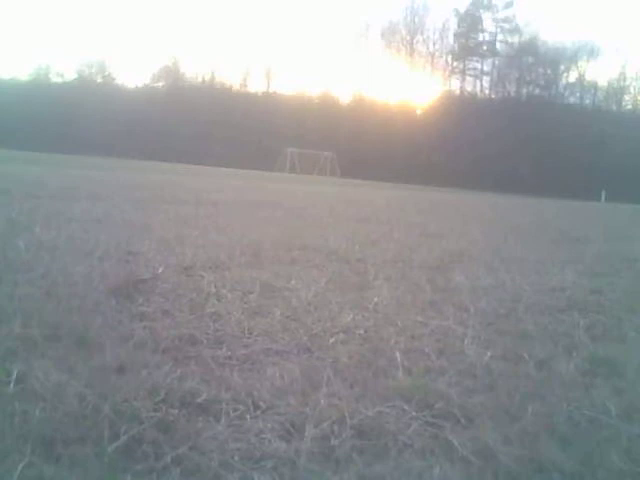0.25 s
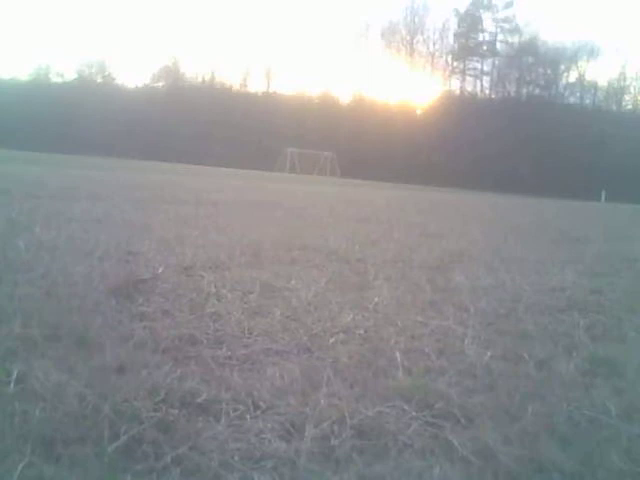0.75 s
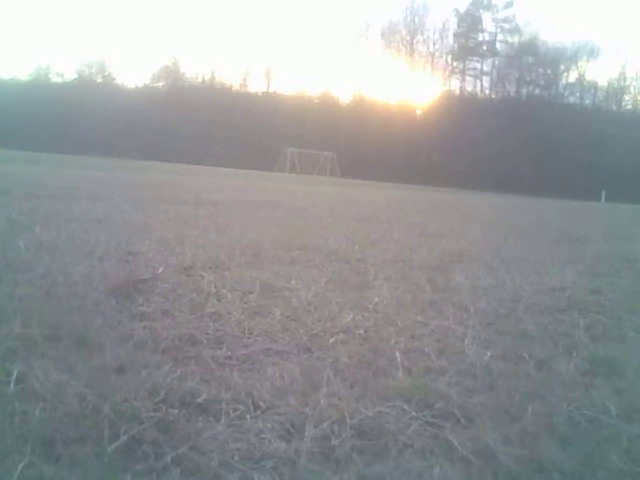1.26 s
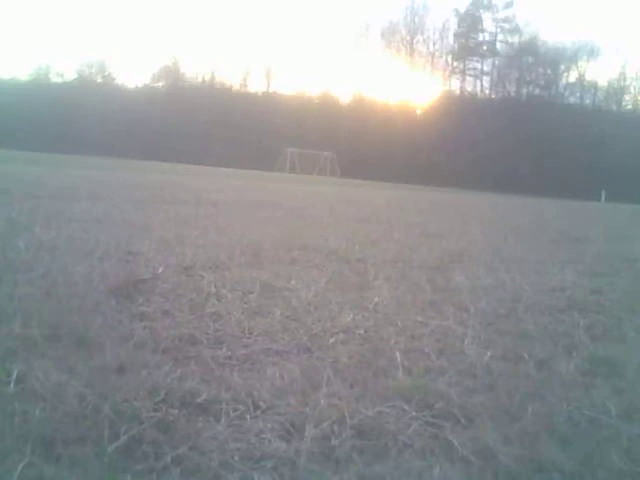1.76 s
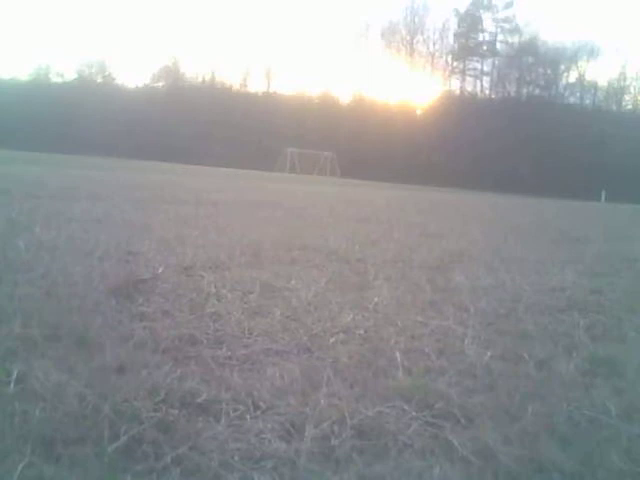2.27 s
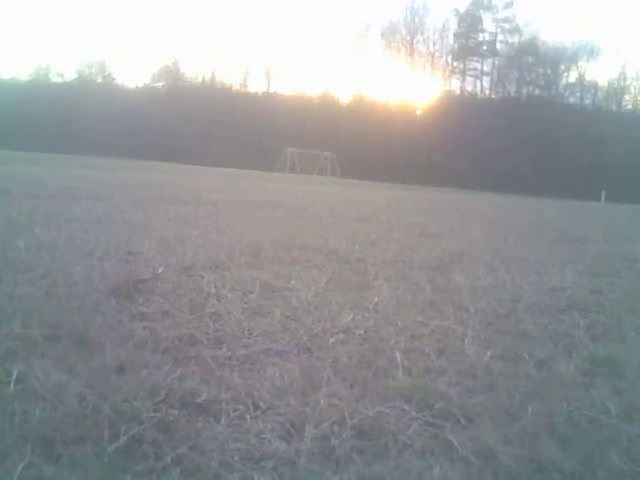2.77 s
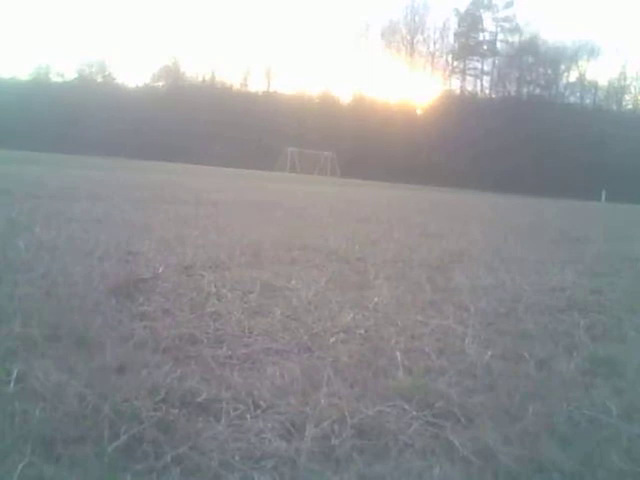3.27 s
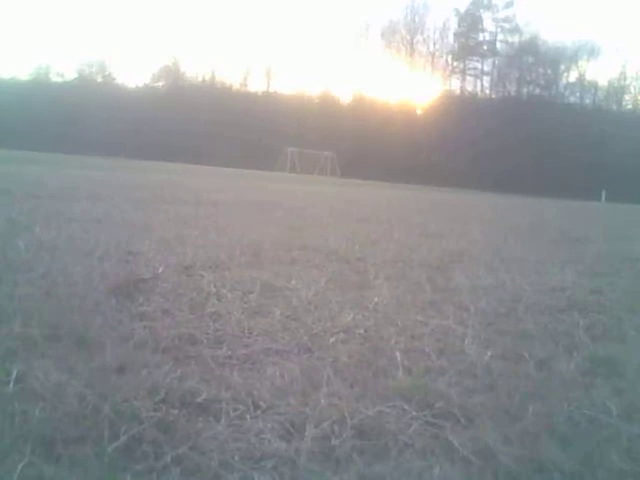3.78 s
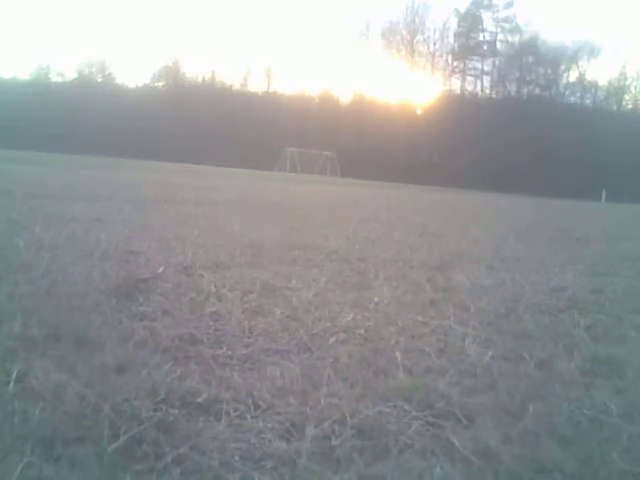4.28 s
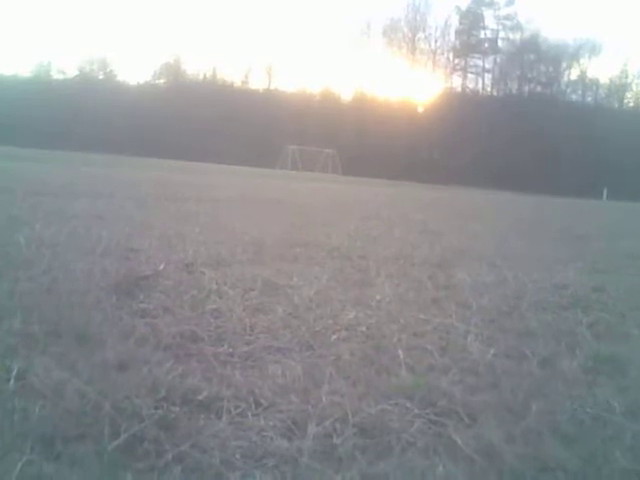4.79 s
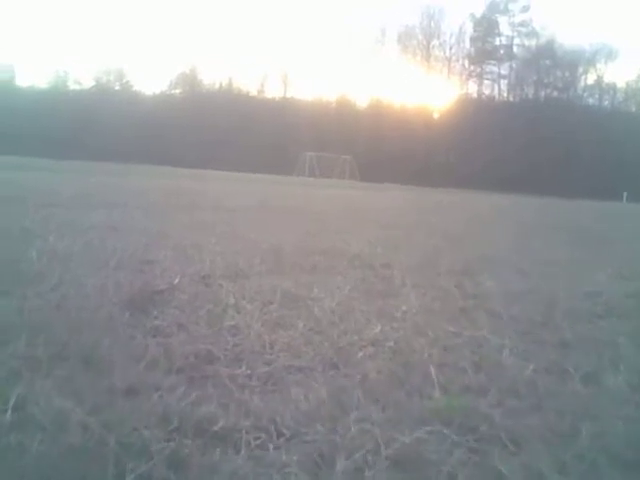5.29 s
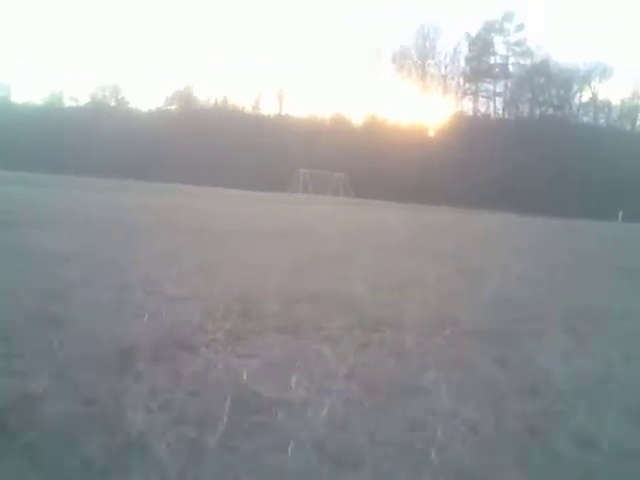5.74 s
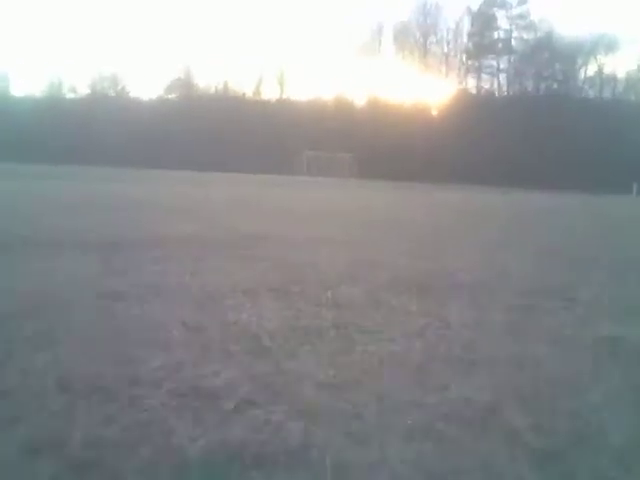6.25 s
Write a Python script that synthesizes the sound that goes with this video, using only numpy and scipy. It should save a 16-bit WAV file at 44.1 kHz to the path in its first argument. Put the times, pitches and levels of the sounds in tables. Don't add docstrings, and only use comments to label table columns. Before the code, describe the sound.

Heard from a tiny microphone on a model jet in an open grassy field, two small fans idle in a rough, fluttering hum with fast servo ticks and faint coil whine. A couple of short servo chirrs come before the throttle opens. The drone lurches upward, grows loud and clipped, and becomes a harsh buzzing blare with shell boom and rattles as the wheels bump over turf.

```python
import sys
import numpy as np
from scipy import signal
from scipy.fft import rfft, irfft
from scipy.io import wavfile
from scipy.ndimage import uniform_filter1d

SR = 44100
rng = np.random.default_rng(int(sys.argv[2]) if len(sys.argv) > 2 else 0)


def materialize(psi):
    bounded = np.clip(np.atleast_2d(psi).T, -1, 1)
    quanta = np.round(bounded * 32767).astype(np.int16)
    wavfile.write(sys.argv[1], SR, quanta)


def how_loud(loudness_db):
    steps = np.asarray(loudness_db, float) / 20
    return 10 ** steps


N = 287532

IDLE_SLOW_HZ, IDLE_FAST_HZ = 119.2, 135.0
MIX_ORDERS = [(2, -1), (1, 0), (0, 1), (-1, 2), (3, -1), (2, 0), (1, 1), (0, 2), (-1, 3), (-2, 4), (4, -1),
              (3, 0), (2, 1), (1, 2), (0, 3), (-1, 4), (-2, 5), (0, 4), (-1, 5), (3, 2), (2, 3), (1, 4),
              (0, 5), (6, 0), (2, 5), (0, 7), (10, 0), (4, 6)]
MIX_LEVELS_DB = [-54, -70, -36, -46, -38, -31.5, -43, -30.5, -46, -67, -25.5, -19, -41, -30, -32, -29.5,
                 -48, -30.5, -34, -49, -29, -29, -53, -34, -46, -35, -35.5, -33]
# centre_hz, width_hz, level_db
SHELL_MODES = [(271, 150, -7.5), (346, 107, 0), (462, 59, -3.5), (497, 190, -8.5), (667, 90, -5.5),
               (887, 74, -6), (1171, 128, -11), (1301, 125, -9.5), (1677, 170, -14.5), (2020, 350, -17),
               (3620, 67, -56), (5090, 76, -25)]
# freq_hz, density_db_per_hz
AIR_SPECTRUM = [(20, -28), (200, -23), (300, -14.5), (1300, -6), (2500, -1), (4500, -35), (7000, -54),
                (11000, -51), (16000, -54)]
# pitch_hz, drift_hz, level_db
COIL_WHINE = [(4992, 12, -48.5), (7590, 1.5, -55), (9710, 12, -66)]
SERVO_RATE_HZ, SERVO_FIRST_S = 45.001, .003
# centre_hz, width_hz, level_db
GEAR_MODES = [(1200, 1370, -2), (2790, 100, 8.5), (3675, 320, 3.5), (4460, 140, -11), (5340, 570, -4),
              (7400, 700, -22)]
# centre_hz, width_hz, level_db
CHATTER_MODES = [(2040, 550, 7), (3400, 900, 0), (5500, 1400, -6.5), (6400, 500, -10), (7600, 600, -4.5),
                 (8700, 700, -7)]
# start_s, end_s, level_db
SERVO_SLEWS = [
    (0.02, 0.09, 1.5),
    (2.35, 2.407, 6),
    (2.473, 2.6, 4),
]
# time_s, speed_hz
SHAFT_SPEED = [(3.1, 138.7), (3.2, 151.3), (3.33, 170.7), (3.5, 179.2), (3.85, 183), (3.93, 178),
               (4.05, 183), (4.22, 182.9), (4.44, 198), (4.67, 237.6), (4.87, 253), (4.99, 278.7),
               (5.15, 298.1), (5.28, 303), (5.41, 323.7), (5.5, 323), (5.62, 353.2), (5.9, 364.4)]
# time_s, overdrive_db
OVERDRIVE = [
    (3.1, 3),
    (3.4, 9),
    (4.4, 11),
    (4.75, 23),
    (5.45, 23),
    (5.75, 19),
    (6.52, 17),
]
# centre_s, half_length_s, share_lost
GRIP_SLIPS = [
    (3.439, 0.01, 1),
    (3.572, 0.03, 0.87),
    (3.918, 0.031, 0.87),
    (5.502, .012, 0.95),
]
# centre_hz, width_hz, level_db
RATTLE_MODES = [(626, 240, 0), (1182, 220, 6), (1930, 730, -4.5), (3530, 4900, -20)]
# centre_s, half_length_s, level_db
AIRFRAME_JOLTS = [(3.201, 0.042, 11.5), (3.3, 0.024, 9.5), (3.468, 0.033, 6.5), (3.696, 0.061, 8.5),
                  (3.907, 0.033, -9.5), (3.997, 0.03, 0.5), (4.115, 0.23, 7.5), (4.41, 0.084, 7.5),
                  (4.54, 0.0069, 11.5), (4.597, 0.029, 2.5), (5.084, 0.055, 8), (5.263, 0.054, 6.5),
                  (5.507, 0.0065, 3), (5.604, 0.025, -2), (5.752, .02, 3.5), (5.876, 0.0059, 17),
                  (5.93, 0.015, 7.5), (6.157, 0.0077, -5), (6.267, 0.025, 8.5), (6.292, 0.0085, 3.5),
                  (6.336, 0.012, 16.5), (6.42, 0.029, 7.5)]
# speed_hz, order1_db, order2_db, order3_db
ORDER_RESPONSE = [(140, -53, -22.5, -19), (155, -32.5, -11, -29), (183, -33, -9, -40),
                  (195.4, -14.5, -6.5, -32), (219.74, -3, -20, -32), (224, -7.5, -65, -16),
                  (280, -8.5, -43.5, -34), (343, -11.5, -29, -36.5)]
# start_s, end_s, odd_order_db
SWING_LIMPS = [
    (3.292, 3.597, 15.5),
    (3.73, 3.935, 20.5),
    (4.15, 4.328, 15.5),
]
# time_s, share
LOOSENESS = [(3.1, 0.86), (4.3, .75), (4.46, 0.87), (4.52, 0.63), (4.7, 0.18), (4.97, 0.35), (5.1, 0.5),
             (5.4, 0.2), (5.62, 0.86), (5.84, 0.8)]
# time_s, beat_hz
SHAFT_GAP = [(3.55, 55.54), (3.72, 37.17), (4.0, 52.11), (4.6, 68.9), (5.1, 60.3)]
# time_s, share
BIAS_SAG = [(3.55, 0.062), (3.7, .15), (4.1, .1), (4.53, 0.25), (4.65, -0.1), (4.74, .14), (4.87, 0.11),
            (4.97, 0.43), (5.06, 0.12), (5.13, 0.34), (5.36, 0.33), (5.44, .08), (5.52, 0.29), (5.6, 0.11),
            (5.9, .2), (6.5, 0.25)]
BOOM_TIGHT_DB, BOOM_LOOSE_DB = -46, -15
RATTLE_TIGHT_DB, RATTLE_LOOSE_DB = -35, -23
ROLL_START_S, ROLL_END_S, ROLL_RATTLE_DB = 4.77, 7.07, 18
BOUNCE_START_S, BOUNCE_END_S = 5.8, 6.0
BOUNCE_BOOM_DB, BOUNCE_ORDER_DB, BOUNCE_LOOSE_SHARE = 4.5, -6, 0.13
RAIL_FLOOR, RAIL_CEILING, PREAMP_BIAS = -.707, .12, -.45
LEAK_SHARE = .2


def seconds():
    return np.arange(N) / SR


def curve(table):
    time_s, value = np.array(table, float).T
    return np.interp(seconds(), time_s, value)


def ramp(start_s, end_s):
    return np.clip((seconds() - start_s) / (end_s - start_s), 0, 1)


def bumps(table):
    t = seconds()
    return sum(height * np.exp(-((t - at_s) / half_s) ** 2) for at_s, half_s, height in table)


def unit(x):
    return x / np.sqrt(np.mean(x ** 2))


def noise():
    return rng.standard_normal(N)


def walk(rate_hz):
    length = int(SR / rate_hz)
    return unit(uniform_filter1d(uniform_filter1d(noise(), length), length))


def phase(hz):
    return 2 * np.pi * np.cumsum(hz) / SR


def ring(x, hz, width_hz):
    return signal.lfilter(*signal.iirpeak(hz, hz / width_hz, SR), x)


def body(x, modes):
    return sum((-1) ** k * how_loud(db) * ring(x, hz, width) for k, (hz, width, db) in enumerate(modes))


def steep(x, modes):
    return sum(how_loud(db) * ring(ring(x, hz, width), hz, 2 * width) for hz, width, db in modes)


def idle_shaft(hz):
    spool_up = curve([(3.03, 1), (3.2, 1.13), (3.5, 1.33)])
    hunting_hz = .35 * walk(3) + .9 * walk(25)
    return phase(hz * spool_up + hunting_hz)


def coil_whine():
    spool_up = curve([(3.0, 1), (3.1, 1.02), (3.3, 1.12)])
    whine = 0
    for hz, drift_hz, db in COIL_WHINE:
        level = np.sqrt(2) * how_loud(db + 1.5 * walk(30))
        whine = whine + level * np.sin(phase(hz * spool_up + drift_hz * walk(5)))
    return whine


def idle():
    slow, fast = idle_shaft(IDLE_SLOW_HZ), idle_shaft(IDLE_FAST_HZ)
    tones = 0
    for (a, b), db in zip(MIX_ORDERS, MIX_LEVELS_DB):
        level = np.sqrt(2) * how_loud(db + 0.71 * walk(8.2))
        tones = tones + level * np.sin(a * slow + b * fast + rng.uniform(0, 2 * np.pi))
    buffet_db = 2.8 * np.sin(slow) + 0.54 * np.sin(fast) + 1.86 * np.sin(fast - slow)
    hum = ring(unit(body(noise() * how_loud(buffet_db), SHELL_MODES)), 940, 5500)
    fade = curve([(3.05, 0.97), (3.4, 0.54), (4.5, 0.023)])
    return (tones + how_loud(-19.5) * hum + coil_whine()) * fade


def air():
    hz, db = np.transpose(AIR_SPECTRUM)
    bins_hz = np.maximum(np.fft.rfftfreq(N, 1 / SR), 1)
    gain = how_loud(np.interp(np.log(bins_hz), np.log(hz), db))
    return how_loud(-61) * unit(irfft(rfft(noise()) * gain, N))


def servo():
    t = seconds()
    pulse_s = SERVO_FIRST_S + np.arange(int(N / SR * SERVO_RATE_HZ)) / SERVO_RATE_HZ
    at = (pulse_s * SR).astype(int)
    knocks = np.zeros(N)
    knocks[at] = how_loud(0.83 * rng.standard_normal(len(at)))
    ticks = how_loud(-39) * unit(steep(knocks, GEAR_MODES))
    slew = sum(how_loud(db) * (t > start) * (t < end) for start, end, db in SERVO_SLEWS)
    slew = uniform_filter1d(slew, size=400)
    teeth = np.exp(-(2 * SERVO_RATE_HZ * (t - SERVO_FIRST_S) % 1) / .4)
    return ticks + how_loud(-17.5) * steep(noise() * slew * teeth, CHATTER_MODES)


def shaft_orders(loose, bounce, grip):
    speed_hz = curve(SHAFT_SPEED)
    wobble = .55 * loose ** 2.96 * np.sin(phase(curve(SHAFT_GAP) + 4 * walk(11)))
    angle = phase(speed_hz * (1 + .0008 * walk(40)))
    limp_db = sum(db * ramp(start, end) ** 0.4 * (1 - ramp(end, end + 0.026))
                  for start, end, db in SWING_LIMPS)
    response = np.array(ORDER_RESPONSE, float).T
    peaks = []
    for order in (1, 2, 3):
        db = np.interp(speed_hz, response[0], response[order])
        db = db + order % 2 * limp_db + BOUNCE_ORDER_DB * bounce + 1.66 * loose * walk(25)
        peaks.append(np.sqrt(2) * how_loud(db) * grip)
    tone = peaks[0] * np.sin(angle + wobble)
    tone = tone + peaks[1] * np.sin(2 * angle - .6 + wobble)
    tone = tone + peaks[2] * np.sin(3 * angle - 2.8)
    return tone, peaks


def shell_boom(boom_db, jolt_db):
    return how_loud(boom_db + 0.48 * jolt_db) * unit(ring(ring(noise(), 349.5, 163), 327, 268))


def loose_rattle(rattle_db, jolt_db, bounce):
    knock = noise() * how_loud((1.4 + 2.2 * bounce) * walk(110) + jolt_db)
    return how_loud(rattle_db) * unit(steep(knock, RATTLE_MODES))


def throttle():
    over = how_loud(curve(OVERDRIVE)) * curve([(3.03, 0), (3.15, 1)])
    bounce = ramp(BOUNCE_START_S, BOUNCE_END_S)
    loose = np.clip(curve(LOOSENESS) + BOUNCE_LOOSE_SHARE * bounce, 0, 1.2)
    grip = 1 - bumps(GRIP_SLIPS)
    jolt_db = bumps(AIRFRAME_JOLTS)
    boom_db = BOOM_TIGHT_DB + (BOOM_LOOSE_DB - BOOM_TIGHT_DB) * np.minimum(loose, 1)
    boom_db = boom_db + BOUNCE_BOOM_DB * bounce
    rattle_db = RATTLE_TIGHT_DB + (RATTLE_LOOSE_DB - RATTLE_TIGHT_DB) * loose
    rattle_db = rattle_db + ROLL_RATTLE_DB * ramp(ROLL_START_S, ROLL_END_S)
    tone, peaks = shaft_orders(loose, bounce, grip)
    boom = shell_boom(boom_db, jolt_db)
    rattle = loose_rattle(rattle_db, jolt_db, bounce)
    swing = np.sqrt(sum(p ** 2 for p in peaks) + 2 * how_loud(boom_db) ** 2 + 2 * how_loud(rattle_db) ** 2)
    sag = (curve(BIAS_SAG) * grip - 0.093 * (1 - grip)) * swing
    return over * (tone + boom + rattle - sag)


def scene():
    return (idle() + air() + servo() + throttle())[None]


def top_cut(x):
    return signal.sosfilt(signal.butter(12, 15830, fs=SR, output="sos"), x)


def record(dry):
    knee = 0.011
    x = dry + PREAMP_BIAS
    x = RAIL_FLOOR + knee * np.logaddexp(0, (x - RAIL_FLOOR) / knee)
    excess = np.maximum(x - RAIL_CEILING, 0)
    ripple = 0.016 * unit(ring(noise(), 5800, 7000))
    sponge = 0.045 * np.tanh(excess / 0.33) + (0.044 + ripple) * np.log1p(excess)
    x = np.minimum(x, RAIL_CEILING) + sponge
    x = signal.sosfilt(signal.butter(1, 4500, fs=SR, output="sos"), x - PREAMP_BIAS)
    hissy = x + how_loud(-48.0) * noise()
    filtered = signal.sosfilt(signal.butter(8, 11900, fs=SR, output="sos"), hissy)
    mix = (filtered + LEAK_SHARE * x) / (1 + LEAK_SHARE) + PREAMP_BIAS
    return top_cut(mix)


dry = scene()
out = record(dry)
materialize(out)
```